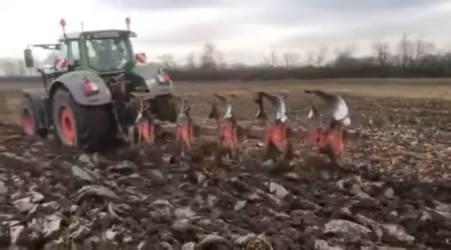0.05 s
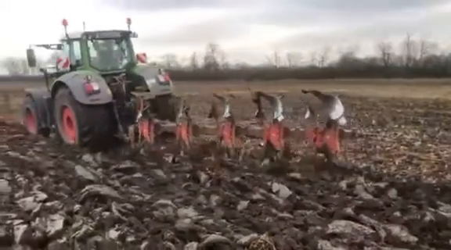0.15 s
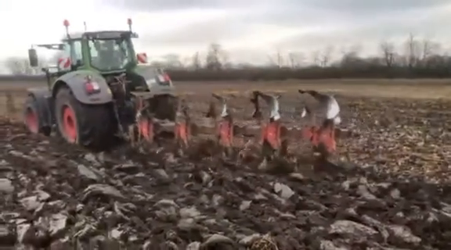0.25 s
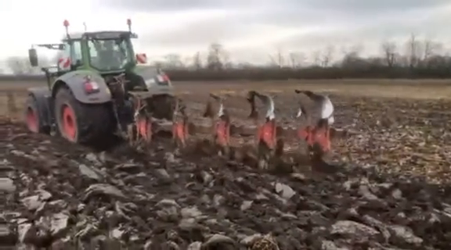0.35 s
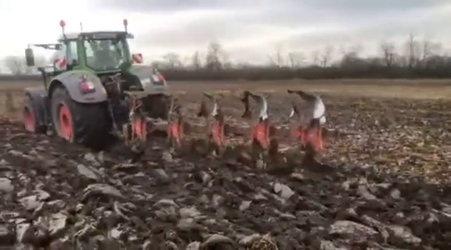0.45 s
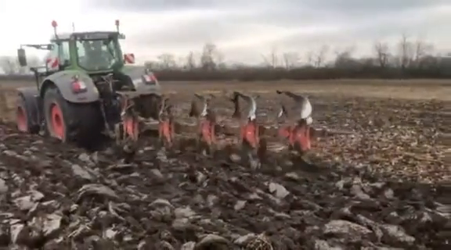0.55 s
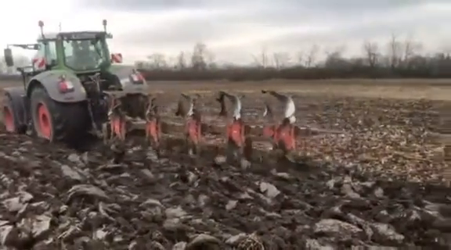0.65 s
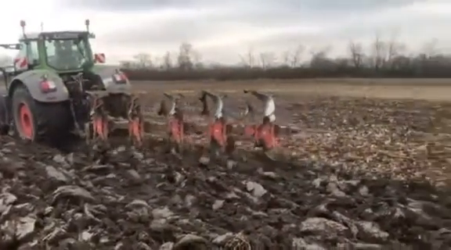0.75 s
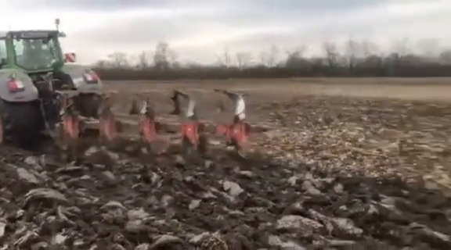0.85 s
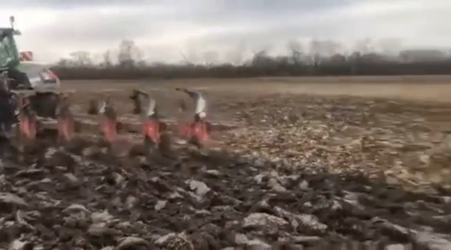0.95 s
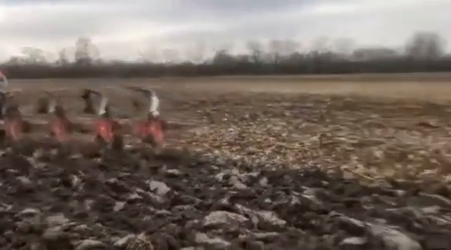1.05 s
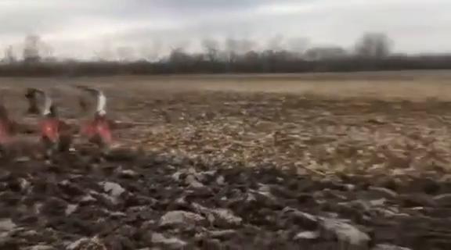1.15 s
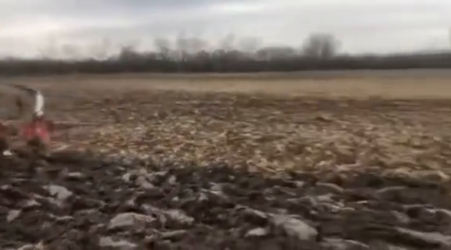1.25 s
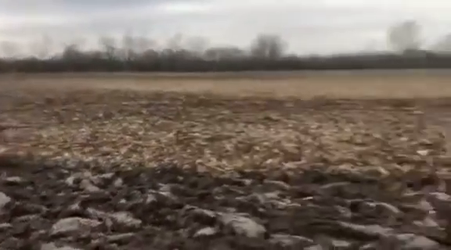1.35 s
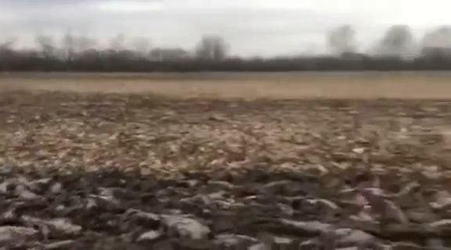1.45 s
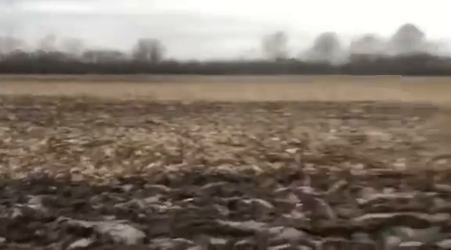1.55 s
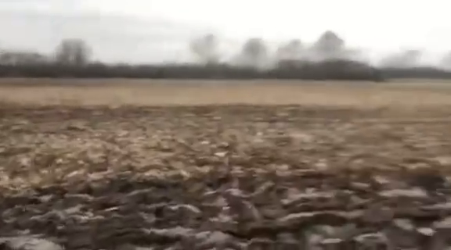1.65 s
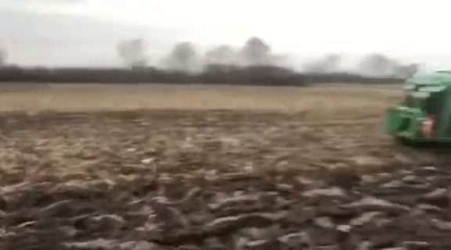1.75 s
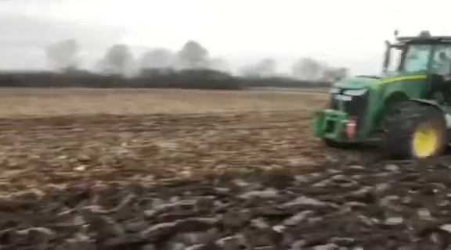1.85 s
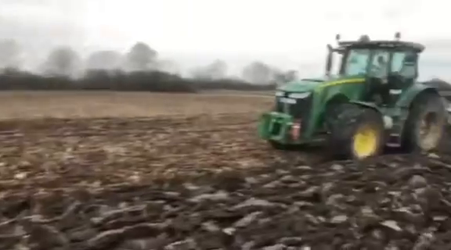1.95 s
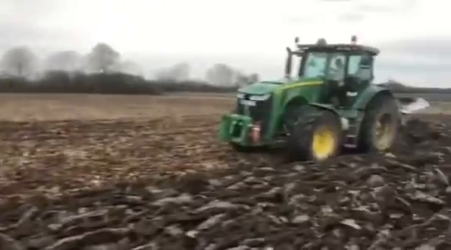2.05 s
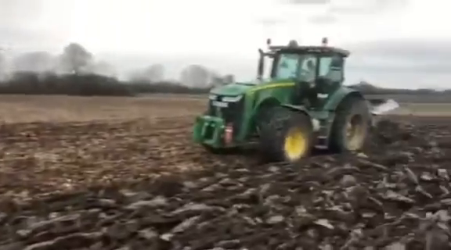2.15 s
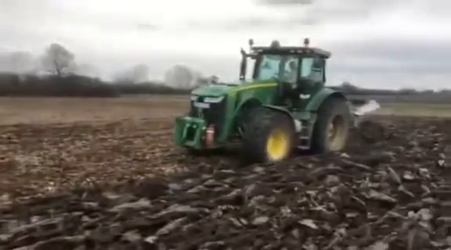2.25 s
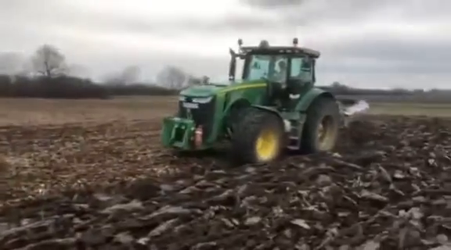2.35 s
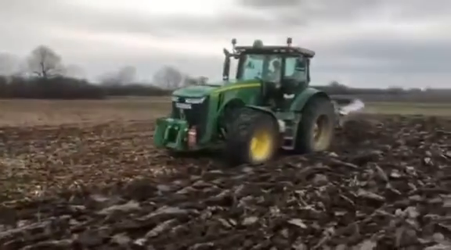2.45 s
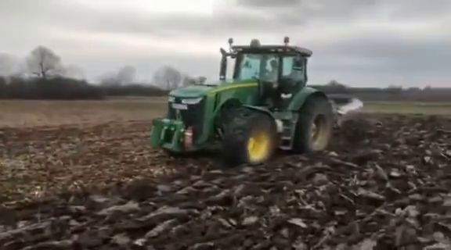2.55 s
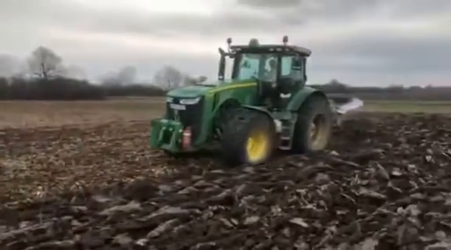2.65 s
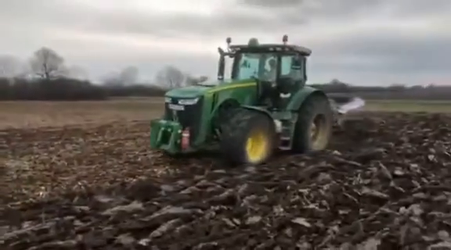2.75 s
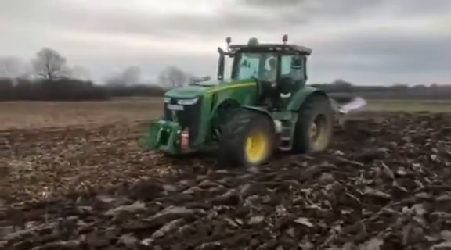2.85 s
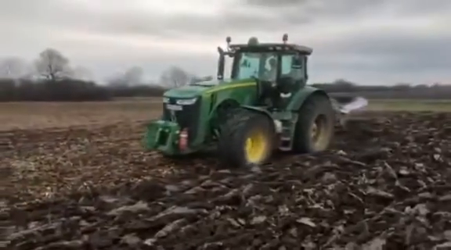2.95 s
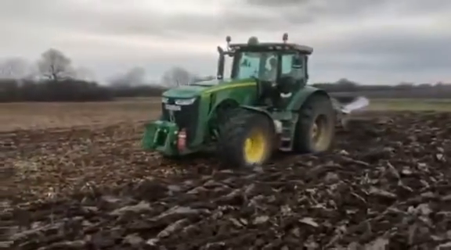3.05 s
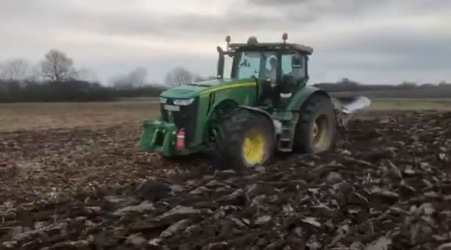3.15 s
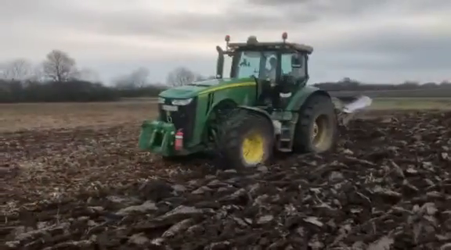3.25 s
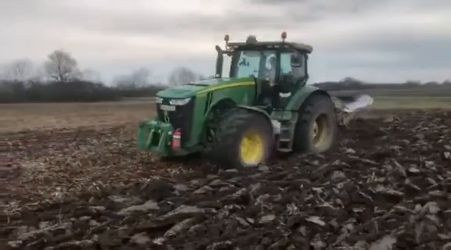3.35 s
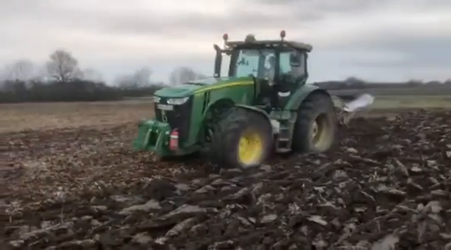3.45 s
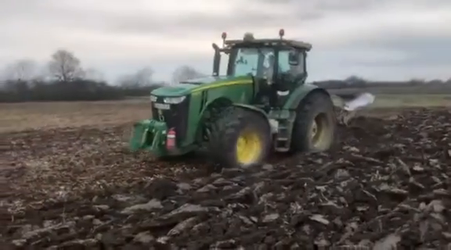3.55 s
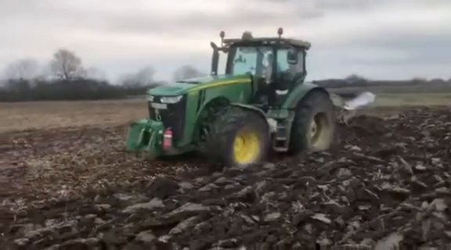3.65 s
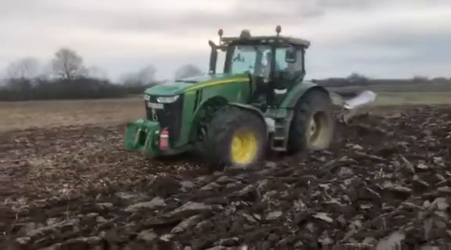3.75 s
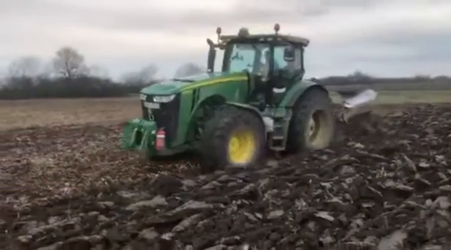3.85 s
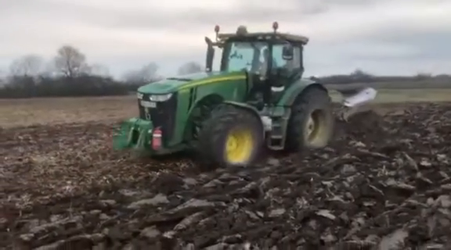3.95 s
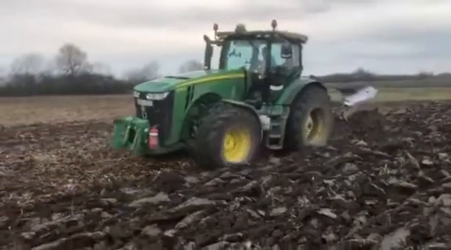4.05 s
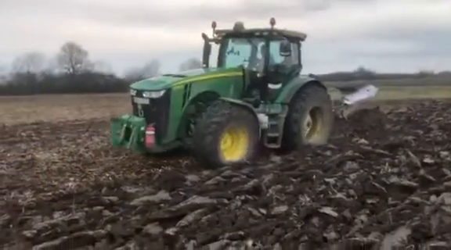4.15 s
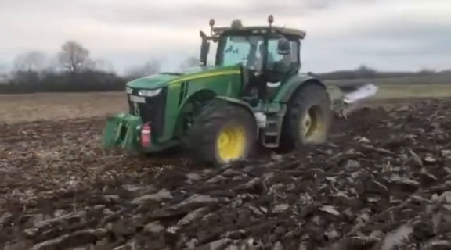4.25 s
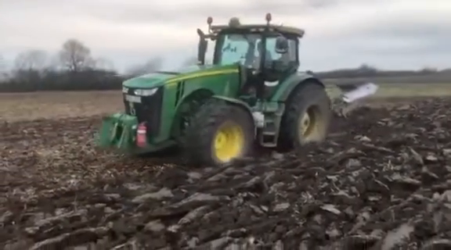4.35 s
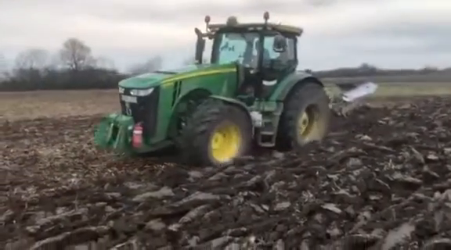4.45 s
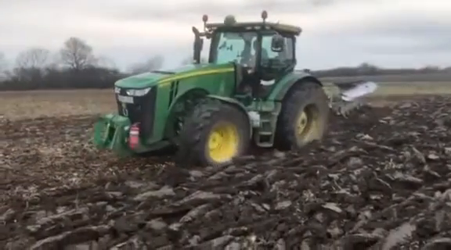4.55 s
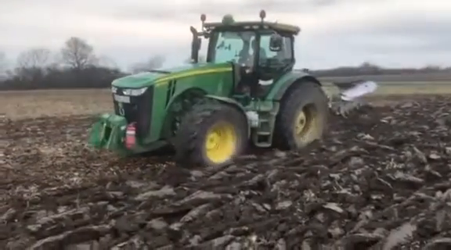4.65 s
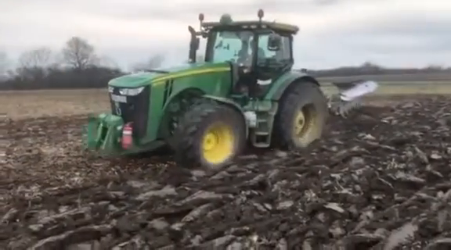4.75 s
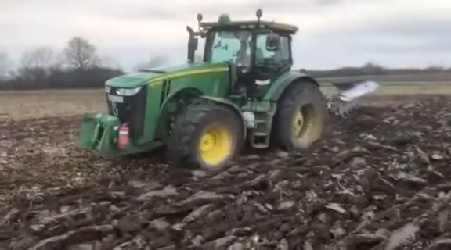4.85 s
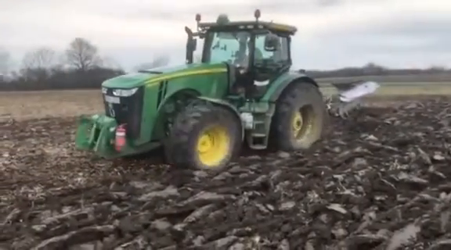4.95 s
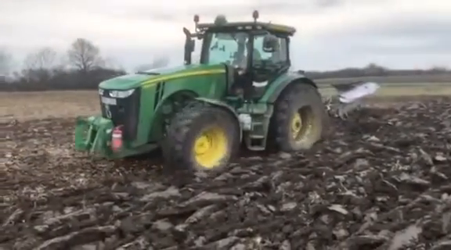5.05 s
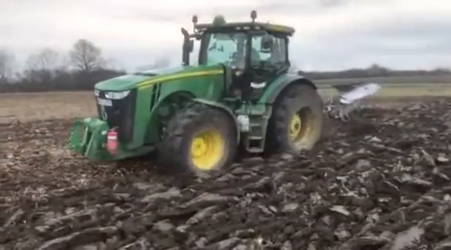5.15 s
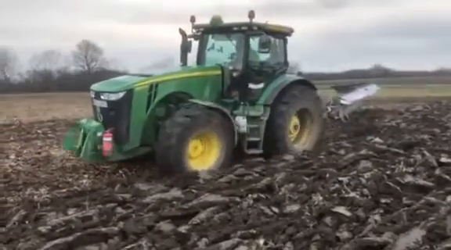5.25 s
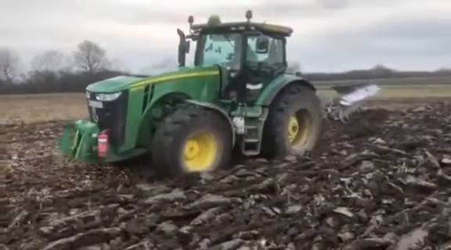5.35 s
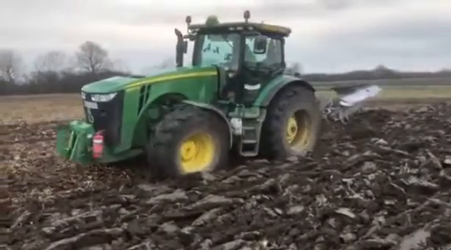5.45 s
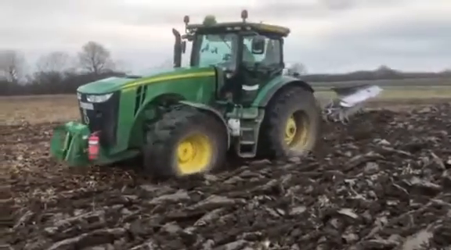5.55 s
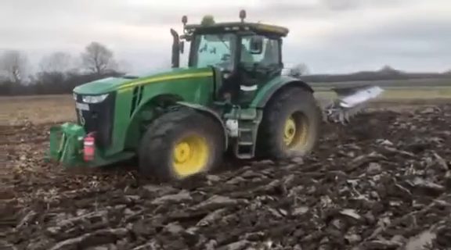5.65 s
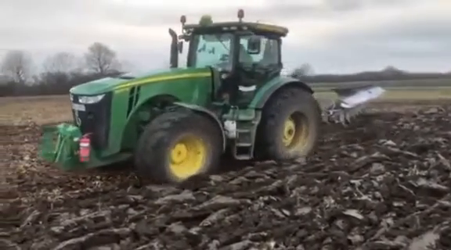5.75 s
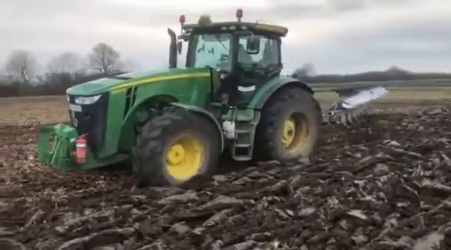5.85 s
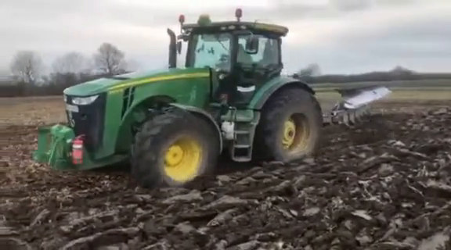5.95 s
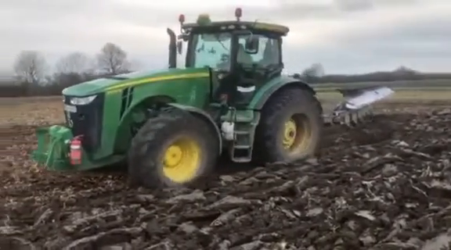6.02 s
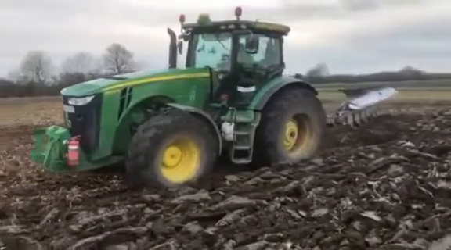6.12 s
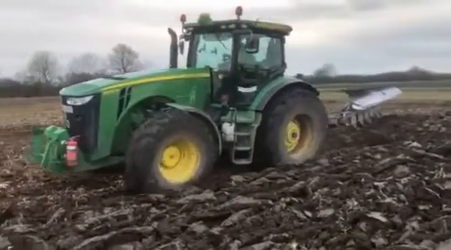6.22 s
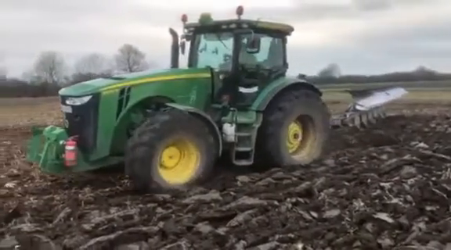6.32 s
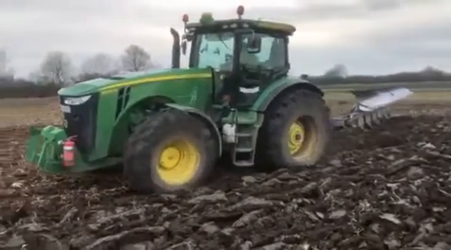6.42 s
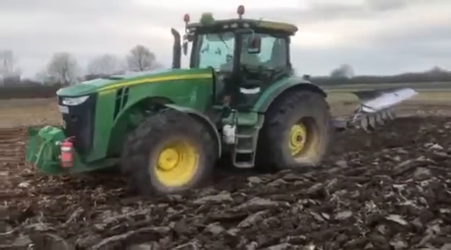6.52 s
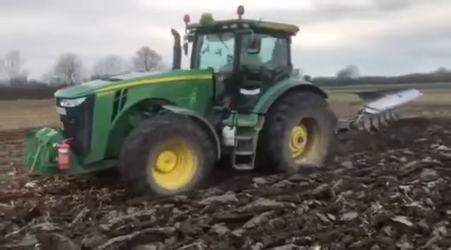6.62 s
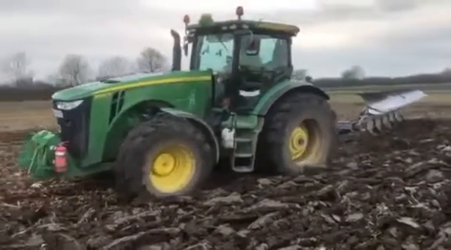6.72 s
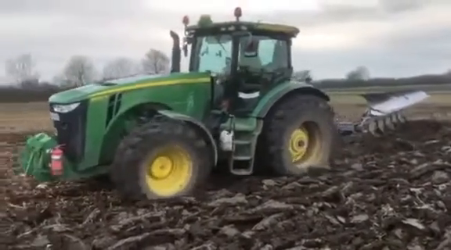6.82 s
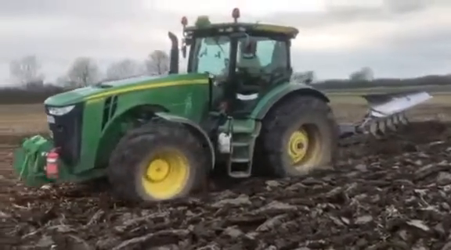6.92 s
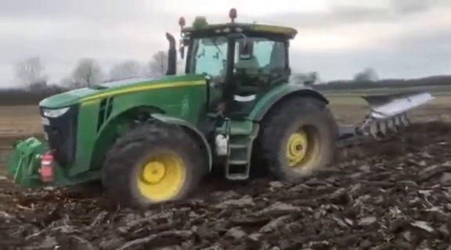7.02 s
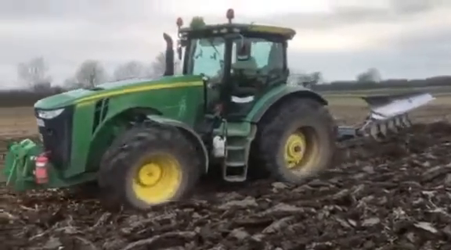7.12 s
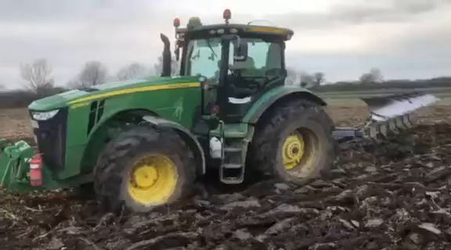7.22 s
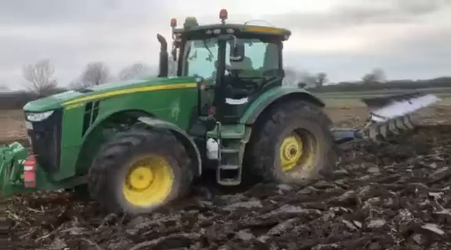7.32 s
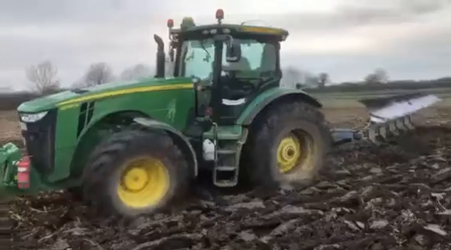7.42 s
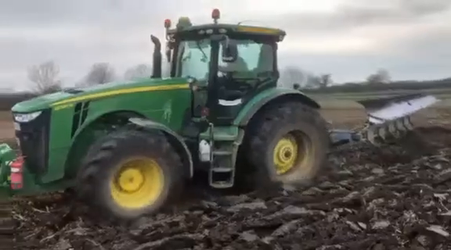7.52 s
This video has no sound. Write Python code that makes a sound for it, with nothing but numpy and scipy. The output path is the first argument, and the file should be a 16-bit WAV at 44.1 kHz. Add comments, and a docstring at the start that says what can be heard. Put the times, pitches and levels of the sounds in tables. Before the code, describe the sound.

Two tractors plough an open field. At first the farther one hums with a thin gear whine and a rasping plough, over rumbling, crackling soil. Its hum fades as the phone turns to a nearer diesel tractor, which grows steadily louder with a fan drone, booming exhaust, engine clatter and turbo hiss. Steel scrapes briefly through stony ground, gears whine in spells, and the roar swells into a few short low hoots.

```python
"""Two tractors plough an open stubble field. From the start a far one hums and whines, soil crumbles,
and a six-cylinder diesel draws near: its fan drones, its exhaust booms, its block clatters, its turbo
hisses. From 0.75 to 2 s the phone that hears them swings to the near one, and a low hoot sounds.
Gears begin to whine in spells, and plough steel scrapes through stony soil, slipping free at 2.7 s.
Two more hoots follow at 4.4 and 5.1 s as the near tractor keeps coming closer."""
import sys
import numpy as np
from scipy import signal
from scipy.fft import rfft, irfft, next_fast_len
from scipy.io import wavfile
from scipy.ndimage import uniform_filter1d, map_coordinates

SR = 44100
rng = np.random.default_rng(int(sys.argv[2]) if len(sys.argv) > 2 else 0)


def master_out(mix):
    """Clip the mix to full scale and print it as 16-bit PCM to the path in sys.argv[1]."""
    frames = np.transpose(np.atleast_2d(mix))
    ceiling = np.clip(frames, -1, 1)
    pcm = np.round(ceiling * 32767).astype(np.int16)
    wavfile.write(sys.argv[1], SR, pcm)


N = 334278
TIME = np.arange(N) / SR


def gain(db):
    """Turn decibels into a number to multiply by."""
    return 10 ** (np.asarray(db) / 20)


def unit(x):
    """Scale a sound to an average strength (rms) of 1."""
    return x / np.sqrt(np.mean(x ** 2))


def curves(table):
    """Join the rows of a timed table with straight lines, one curve per column."""
    times, *columns = np.transpose(table)
    return [np.interp(TIME, times, column) for column in columns]


def wander(rate):
    """A smooth random wobble of size 1 that finds about `rate` new values a second."""
    hold = max(int(SR / rate), 2)
    steps = np.repeat(rng.standard_normal(N // hold + 1), hold)
    return unit(uniform_filter1d(uniform_filter1d(steps, hold), hold)[:N])


def turns_of(hz):
    """Count the turns made so far at a changing speed."""
    return np.cumsum(hz) / SR


def tone(turns, waver_db, waver_rate):
    """A pure note, one wave per turn, that wavers in loudness."""
    wave = np.sin(2 * np.pi * (turns + rng.random()))
    return unit(wave * gain(waver_db * wander(waver_rate)))


def colour(x, spectrum):
    """Shape a sound by rows of f/Hz, level/dB; past the ends it drops 20 dB an octave."""
    hz, db = np.transpose(spectrum)
    size = next_fast_len(N)
    octave = np.log2(np.maximum(np.arange(size // 2 + 1) * SR / size, 1))
    outside = np.abs(octave - np.clip(octave, np.log2(hz[0]), np.log2(hz[-1])))
    shape_db = np.interp(octave, np.log2(hz), db) - 20 * outside
    return unit(irfft(rfft(x, size) * gain(shape_db), size)[:N])


def treble(x, hz, db):
    """Turn the part above `hz` up or down against the rest."""
    low = signal.sosfilt(signal.butter(3, hz, "low", fs=SR, output="sos"), x)
    high = signal.sosfilt(signal.butter(3, hz, "high", fs=SR, output="sos"), x)
    return unit(low + gain(db) * high)


def breathy_note(hz, width_hz):
    """A narrow band of noise around a moving pitch."""
    smoother = signal.butter(2, width_hz / 2, fs=SR, output="sos")
    slow_noise = signal.sosfilt(smoother, rng.standard_normal(N) + 1j * rng.standard_normal(N))
    return unit(np.real(slow_noise * np.exp(2j * np.pi * turns_of(hz))))


def churn(x, depth_db, rate, width_hz):
    """Let each band of pitch swell and fade on its own, so the sound never sits still."""
    hz, times, bands = signal.stft(x, SR, nperseg=512)
    grid = np.meshgrid(hz / width_hz, times * rate, indexing="ij")
    swells = map_coordinates(rng.standard_normal((128, 128)), grid, mode="wrap")
    return unit(signal.istft(bands * gain(depth_db * swells), SR)[1][:N])


def reflections(x, strength):
    """Add eight weak bounces off soil and body panels; their delays drift as the tractor moves."""
    out = x
    for start, drift, sign in rng.random((8, 3)):
        delay_s = .002 + .014 * start + .003 * (drift - .5) * np.arange(N) / N
        out = out + strength * np.sign(sign - .5) * np.interp(TIME - delay_s, TIME, x)
    return out


def facing_away(start_s=0.75, swing_s=1.255):
    """1 while the phone points at the far tractor, 0 once it has swung to the near one."""
    return np.clip(1 - (TIME - start_s) / swing_s, 0, 1)


def near_level(hz, db, db_per_hz, db_per_halving, away_db, turn_power=1):
    """A near part's level: `db` at its closest and at average speed, less if slower or farther."""
    side_m, speed_m_s, pass_s = 5.1, 2.8, 9.9  # a straight path that will pass the phone
    metres = np.hypot(side_m, speed_m_s * (TIME - pass_s))
    distance_loss = db_per_halving * np.log2(metres / metres.min())
    turn_loss = away_db * facing_away() ** turn_power
    return db + db_per_hz * (hz - hz.mean()) - distance_loss - turn_loss


def rattle(cycle, repeat, size=2800, count=5):
    """Noisy knocks: the share `repeat` comes back each engine cycle, in a slowly shifting pattern."""
    place = np.linspace(0, count - 1, N)
    recurring = 0
    for k, pattern in enumerate(rng.standard_normal((count, size))):
        weight = np.cos(np.pi / 2 * np.clip(place - k, -1, 1))
        recurring = recurring + weight * np.interp(cycle % 1 * size, np.arange(size), pattern)
    return np.sqrt(repeat) * unit(recurring) + np.sqrt(1 - repeat) * rng.standard_normal(N)


def firings(cycle, depth, decay, scatter_db):
    """Six unequal cylinders fire in turn; each push of pressure jumps up and dies away."""
    cylinder_db = np.array([2.5, -3.0, -9.0, -1.5, -5.0, -3.0])
    stroke = cycle * 6 + 1 + .11 * wander(60)  # loose parts make each knock early or late
    number = stroke.astype(int)
    chance_db = scatter_db * rng.standard_normal(number.max() + 1)[number]
    strength = gain(cylinder_db[number % 6] + chance_db)
    return 1 + depth * strength * np.exp(-(stroke % 1) / decay)


# the far tractor's gear whine: t/s, f/Hz, level/dB
FAR_WHINE = [(0, 502, -44), (.4, 503, -40.5), (.8, 505, -44), (1.05, 506, -41), (1.27, 506.6, -45),
             (1.5, 506.5, -39), (2.1, 506, -37), (2.4, 505, -42), (2.8, 502, -39), (3.08, 502.5, -43),
             (3.38, 504, -34), (3.55, 507, -43), (3.8, 511, -45), (4.45, 510, -44), (4.66, 510, -36),
             (5.02, 509.5, -45), (5.6, 509, -41), (6.1, 508, -40.5), (6.55, 507.3, -36), (6.82, 507.4, -40),
             (7.08, 507.5, -34), (7.4, 507.6, -41), (7.58, 507.7, -36)]
# its engine notes: multiple of the firing rate, level/dB
FAR_ENGINE_NOTES = [(.75, -3.5), (1, -6), (1.502, -4.5), (3, -0.5), (3.58, -7.5)]
# the rasp of its plough: f/Hz, level/dB
FAR_RASP_SPECTRUM = [(200, 4), (270, 3), (430, 0.5), (550, 4), (620, -2), (750, -3.5), (1100, -12.5),
                     (1250, -13), (1560, -1.5), (1700, -13.5), (2380, -4), (2600, -24.5), (4000, -11.5),
                     (8000, -42)]
def far_tractor(start_firing_hz=80.7):
    """The far engine hums, its gears whine and its plough rasps."""
    whine_hz, whine_db = curves(FAR_WHINE)
    engine_db = -53.5 + 10 * np.minimum(2 * facing_away(), 1)  # fades as the phone turns from it
    firing = turns_of(start_firing_hz * whine_hz / whine_hz[0])
    hum = sum(gain(db) * tone(k * firing, waver_db=0.5, waver_rate=6) for k, db in FAR_ENGINE_NOTES)
    whine = tone(turns_of(whine_hz) + .07 * wander(24), waver_db=2.4, waver_rate=30)
    rasp = colour(reflections(rng.standard_normal(N), strength=0.13), FAR_RASP_SPECTRUM)
    return gain(engine_db) * (hum + gain(7.5) * rasp) + gain(whine_db) * whine


# the rumble in the ground: f/Hz, level/dB
RUMBLE_SPECTRUM = [(20, -23.5), (30, -16), (42, -7.5), (60, -2), (85, 0), (110, -2.5), (135, -2),
                   (200, -20.5), (500, -29.5)]
def soil(grains_per_s=900):
    """Tyres and plough blades rumble through the ground; clods and stubble crackle."""
    rumble = colour(rng.standard_normal(N), RUMBLE_SPECTRUM)
    grains = (rng.random(N) < grains_per_s / SR) * rng.standard_normal(N)
    grains *= gain(3.2 * np.minimum(rng.exponential(size=N), 4))  # a few stand out
    crackle = colour(grains, [(400, 7), (1000, -3), (2400, -4), (5000, -7), (8000, -20)])
    return gain(-40 + 0.5 * wander(1.9)) * rumble + gain(-48.5) * crackle


# the fan's higher notes: multiple of the blade rate, level/dB against the drone
FAN_OVERTONES = [(2, -14.5), (3, -27.5), (4, -26.5)]
def fan(blade_hz):
    """Passing blades drone and flutter in the uneven air behind the radiator."""
    level_db = near_level(blade_hz, db=-24, db_per_hz=0.76, db_per_halving=4.5, away_db=0.5)
    blades = turns_of(blade_hz) + 0.0081 * wander(22)
    drone = tone(blades, waver_db=0.63, waver_rate=34)
    overtones = sum(gain(db) * tone(k * blades + .055 * wander(25), waver_db=2.5, waver_rate=20)
                    for k, db in FAN_OVERTONES)
    edge_db = 60 * np.log10(blade_hz / blade_hz.mean())  # faster blades sound harsher
    return gain(level_db) * (drone + gain(edge_db) * overtones)


# the exhaust's low notes: multiple of the engine cycle rate, level/dB
EXHAUST_NOTES = [(5, -19), (6, -16.5), (11, -4), (12, -19.5), (13, -11), (24, -16)]
# its rushing gas: f/Hz, level/dB
GAS_SPECTRUM = [(110, -34), (150, -2.5), (185, 0), (215, -0.5), (260, -6.5), (350, -7), (440, -9.5),
                (560, -17.5), (900, -48.5)]
def exhaust(cycle, firing_hz):
    """The exhaust pipe booms on low notes, with rough gas flow between them."""
    level_db = near_level(firing_hz, db=-29.5, db_per_hz=0.23, db_per_halving=1.5,
                          away_db=7.5, turn_power=2)
    notes = sum(gain(db) * tone(k * cycle, waver_db=3.5, waver_rate=7) for k, db in EXHAUST_NOTES)
    puffs = rattle(cycle, repeat=0.054) * firings(cycle, depth=0.34, decay=.4, scatter_db=-2.5)
    return gain(level_db) * (notes + gain(-0.5) * colour(puffs, GAS_SPECTRUM))


# the ring of the engine's metal body: f/Hz, level/dB
BLOCK_SPECTRUM = [(300, -29), (480, -5.5), (620, -1), (760, 1), (900, -1.6), (1150, -2), (1350, -7),
                  (1580, -6), (1880, -6.5), (2200, -12), (2430, -9), (2750, -14), (4000, -22.5),
                  (8000, -38)]
# its clear notes: multiple of the engine cycle rate, level/dB
BLOCK_NOTES = [(36, -22), (57, -20), (69, -22), (75, -21), (102, -26.5), (132, -28)]
def engine_block(cycle, firing_hz):
    """Burning fuel, injectors and valves knock on the engine block and make it ring."""
    level_db = near_level(firing_hz, db=-26, db_per_hz=0.23, db_per_halving=1.74, away_db=7)
    knocks = rattle(cycle, repeat=0.28) * firings(cycle, depth=0.28, decay=0.33, scatter_db=4)
    ring = colour(reflections(knocks, strength=0.1), BLOCK_SPECTRUM)
    ring = treble(ring, hz=1234, db=-0.5 + 0.1 * (firing_hz - firing_hz.mean()))  # brighter when fast
    ring = churn(ring, depth_db=1.1, rate=10, width_hz=200)
    drifting_peak = breathy_note(830 * (1 + .14 * wander(4)), width_hz=170)
    roar = unit(ring + gain(-14) * drifting_peak)
    notes = sum(gain(db) * tone(k * cycle + 0.1 * wander(11), waver_db=3.5, waver_rate=8.7)
                for k, db in BLOCK_NOTES)
    notes_db = .5 * (level_db - level_db.max())  # they sing out when the block is loud
    return gain(level_db) * (gain(-0.27) * roar + gain(notes_db) * notes)


# the turbo's hiss: f/Hz, level/dB
HISS_SPECTRUM = [(1800, -22), (3000, -7.5), (4150, -3.5), (4550, 0.3), (4950, -2), (5330, -1.5),
                 (5700, -0.5), (6100, -2), (6500, -2.5), (7400, -4.5), (8300, -7), (8800, -8), (9200, -22)]
# its breathy whistle: t/s, f/Hz, level/dB against the hiss
TURBO_WHISTLE = [(0, 5700, -10), (1.4, 5680, -14), (2.0, 5680, -11), (2.45, 5720, -6), (2.85, 5690, -15),
                 (3.7, 5650, -14), (4.2, 5650, -6), (4.6, 5520, -9.5), (5.1, 5678, -6.5), (5.7, 5694, -11),
                 (6.12, 5692, -6.5), (6.4, 5700, -18), (7.58, 5803, -13)]
def turbo(cycle, firing_hz):
    """Air rushes through the turbo and its pipes, throbbing a little and half whistling."""
    level_db = near_level(firing_hz, db=-29.5, db_per_hz=0.1, db_per_halving=2.2,
                          away_db=13, turn_power=1.74)
    rush = rattle(cycle, repeat=0.14) * firings(cycle, depth=0.3, decay=0.8, scatter_db=4)
    hiss = colour(reflections(rush, strength=0.11), HISS_SPECTRUM)
    hiss = churn(hiss, depth_db=1.4, rate=10, width_hz=190)
    dull_db = .5 * np.minimum(level_db + 38.5, 0)  # duller while it is faint
    flicker_db = 1.3 * wander(14)
    hiss = treble(hiss, hz=7140, db=dull_db + flicker_db)
    whistle_hz, whistle_db = curves(TURBO_WHISTLE)
    whistle = breathy_note(whistle_hz + 39.97 * wander(9), width_hz=360)
    return gain(level_db + 0.18 * wander(24)) * (hiss + gain(whistle_db) * whistle)


# short low hoots: t/s, f/Hz, level/dB, half length/s
HOOT_NOTES = [(1.3, 230, -32.5, .07), (4.44, 192, -34, .07), (5.14, 216, -34, .09)]
def hoots():
    """Now and then the low roar swells on one note."""
    out = 0
    for peak_s, hz, db, half_s in HOOT_NOTES:
        swell = np.exp(-((TIME - peak_s) / half_s) ** 2)
        out = out + gain(db) * swell * tone(hz * TIME, waver_db=2.5, waver_rate=20)
    return out


# spells of whining: start t/s, end t/s, multiple of the engine cycle rate, level/dB
WHINE_SPELLS = [(3.56, 4.02, 43.3, -37.5), (4.1, 4.58, 43.3, -35), (4.58, 5.0, 43.3, -33),
                (5.78, 6.02, 43.5, -36.5), (6.75, 7.18, 43.3, -36), (7.18, 7.42, 43.45, -30.5),
                (7.42, 7.6, 43.15, -35.5), (1.8, 2.45, 44, -40.5), (3.65, 4.0, 44, -35.5),
                (1.7, 2.8, 48, -43.5), (3.6, 6.1, 48, -41), (6.1, 6.58, 48, -39.5), (6.58, 7.45, 48, -36.8),
                (2.8, 3.15, 49, -41), (1.7, 3.3, 50, -42), (6.9, 7.6, 50, -41), (3.15, 3.42, 51, -39.5),
                (6.8, 7.5, 51, -40.5), (1.8, 2.2, 52, -41), (1.9, 2.7, 58, -43), (3.5, 4.02, 58, -40.5),
                (2.35, 2.7, 60, -41), (4.05, 4.55, 63, -40), (4.92, 5.8, 63, -38.4), (5.8, 6.1, 63, -42),
                (2.1, 2.6, 72, -44), (6.8, 7.25, 73, -39.5), (3.76, 4.02, 78.4, -34.7),
                (4.02, 4.78, 78, -37.2), (5.35, 5.75, 78, -39), (6.05, 6.86, 77.85, -38.2),
                (7.0, 7.4, 78, -41)]
def gears(cycle, fade_s=0.11):
    """Gear teeth and engine notes whine in spells as the plough loads the drive."""
    out = 0
    for start, end, multiple, db in WHINE_SPELLS:
        inside_s = np.minimum(TIME - start, end - TIME)
        fade = np.sqrt(np.clip(inside_s / fade_s + .5, 0, 1))
        twist = .0005 * wander(22)  # the shafts twist a little, so the note quivers
        out = out + gain(db) * fade * tone(multiple * (cycle + twist), waver_db=2.4, waver_rate=28)
    return out


# the notes the plough's steel rings with: f/Hz, width/Hz, level/dB
STEEL_NOTES = [(926, 110, -1), (1130, 49, -2.5), (1490, 83, 0), (1570, 78, -8), (1900, 220, -12),
               (2420, 140, -3.5), (6440, 300, -11)]
def scrape(slip_s=2.69, rise_s=0.8, hold_s=0.22, release_s=0.067):
    """Stony soil rubs the steel and makes it ring: the pressure builds, holds, then lets go."""
    t = TIME - slip_s
    pressure = np.clip(np.minimum(1 + (t + hold_s) / rise_s, 1 - t / release_s), 0, 1)
    rubbing = rng.standard_normal(N)
    ring = sum(gain(db) * signal.lfilter(*signal.iirpeak(hz, hz / width, fs=SR), rubbing)
               for hz, width, db in STEEL_NOTES)
    return gain(-34) * pressure * unit(ring)


# the near engine sags and recovers under the plough, and its fan follows on a slipping drive:
# t/s, firing f/Hz, fan blade f/Hz
ENGINE_SPEED = [(0, 91.6, 146.8), (.7, 91.73, 144.6), (1.35, 91.6, 144.4), (2, 94.03, 149.8),
                (2.57, 93.53, 149.6), (2.87, 89.7, 141), (3.35, 90.05, 141.8), (3.74, 95.23, 157.8),
                (4.15, 93.4, 155.3), (4.42, 93.75, 155.7), (4.7, 90.05, 145.5), (5.1, 93.4, 150),
                (5.62, 94.5, 152.5), (5.9, 93.47, 151.5), (6.35, 92.04, 148.1), (6.85, 93.43, 150.6),
                (7.3, 92.8, 149.6), (7.57, 91.65, 146.3)]
def scene():
    """Both tractors and their ploughs, the same in either ear."""
    firing_hz, blade_hz = curves(ENGINE_SPEED)
    cycle = turns_of(firing_hz * (1 + .0006 * wander(10))) / 6  # six firings make one engine cycle
    near = fan(blade_hz) + exhaust(cycle, firing_hz) + engine_block(cycle, firing_hz)
    near += gears(cycle) + turbo(cycle, firing_hz)
    return np.tile(near + far_tractor() + hoots() + soil() + scrape(), (2, 1))


def record(dry, top_hz=9150):
    """The phone sharply cuts off the highest sounds."""
    return signal.sosfilt(signal.ellip(12, .2, 90, top_hz, fs=SR, output="sos"), dry)


dry = scene()
out = record(dry)
master_out(out)
```